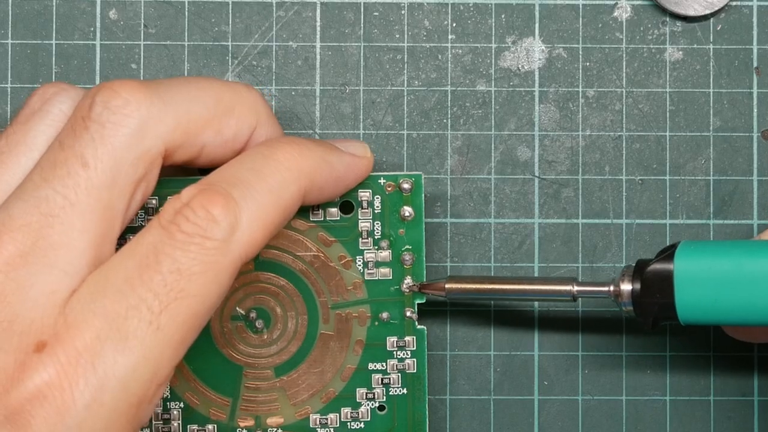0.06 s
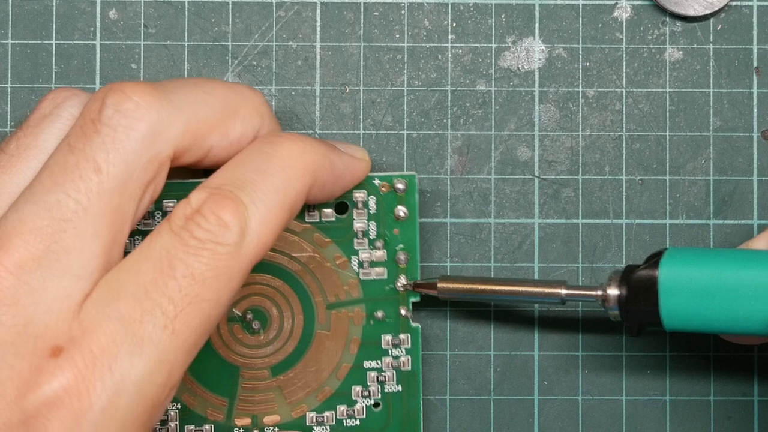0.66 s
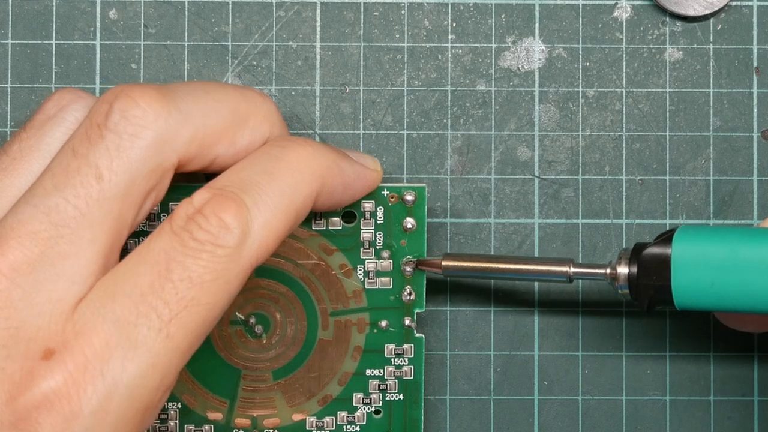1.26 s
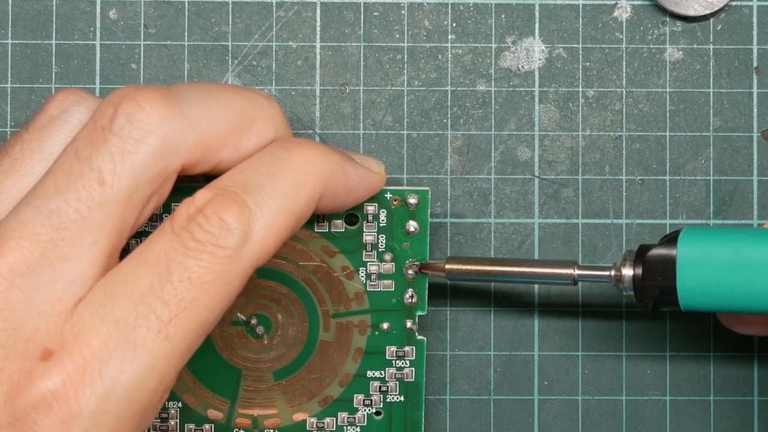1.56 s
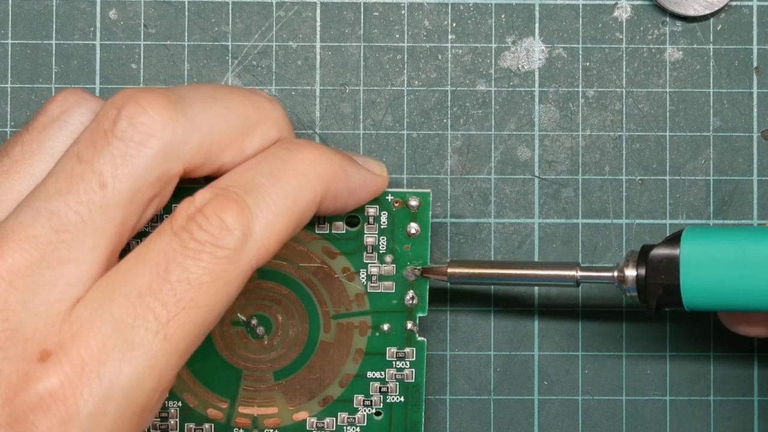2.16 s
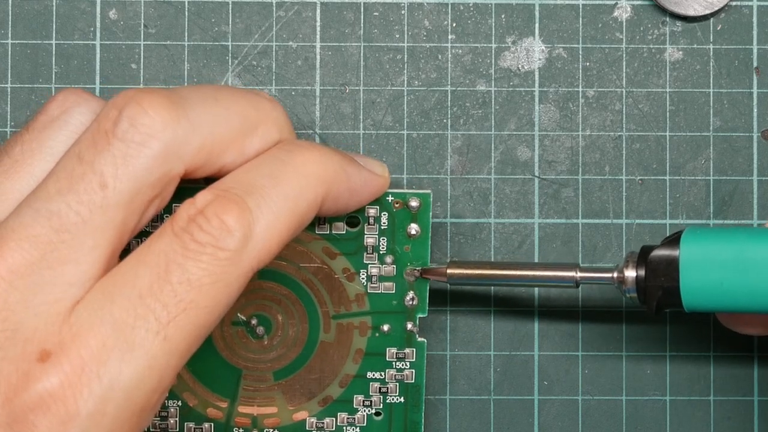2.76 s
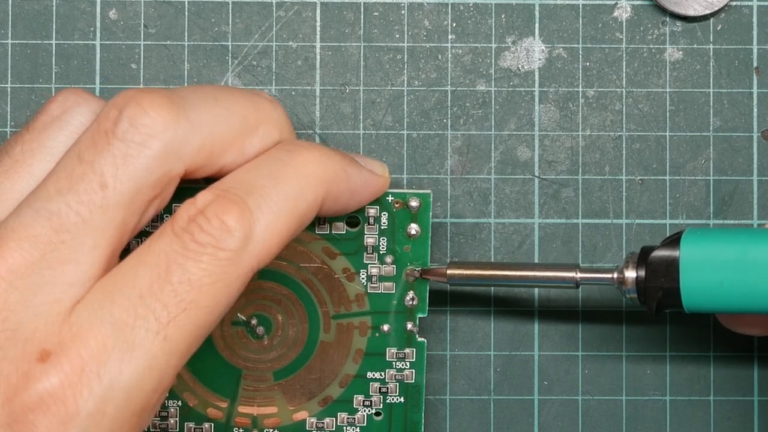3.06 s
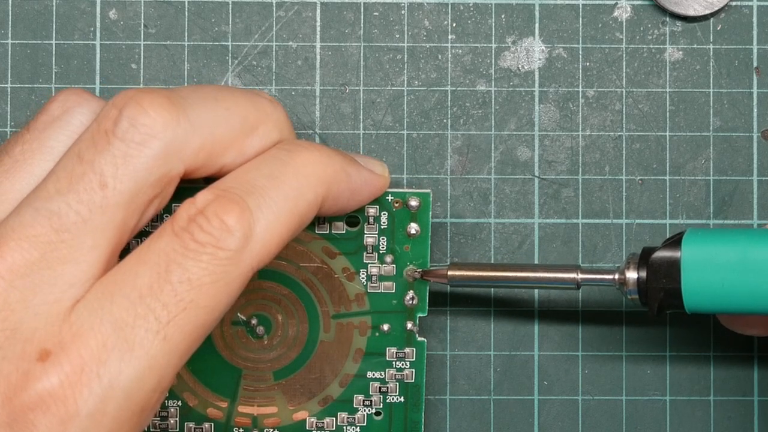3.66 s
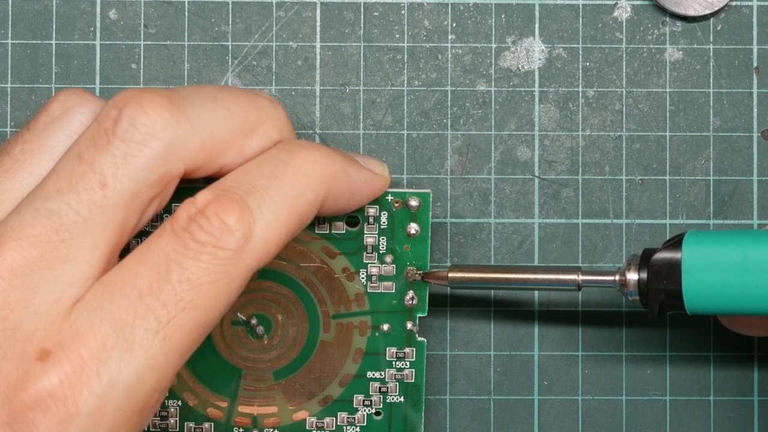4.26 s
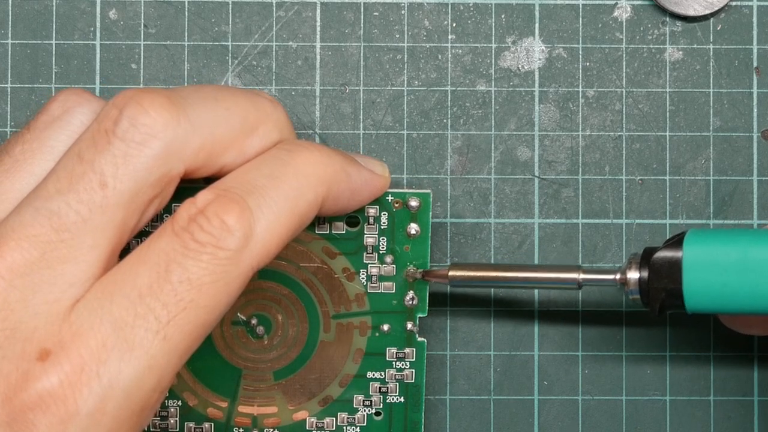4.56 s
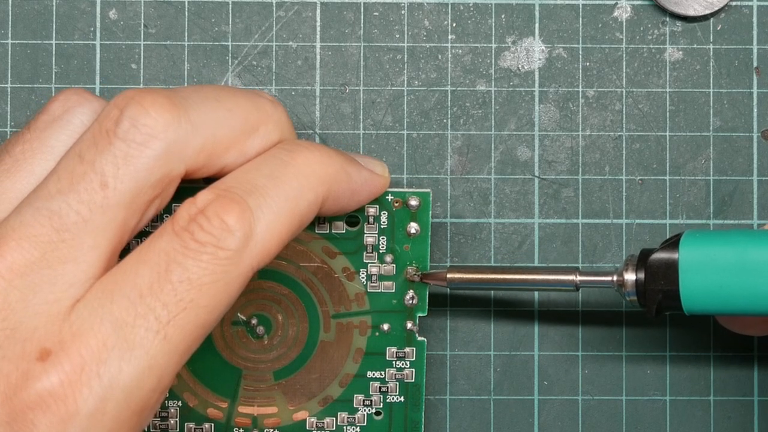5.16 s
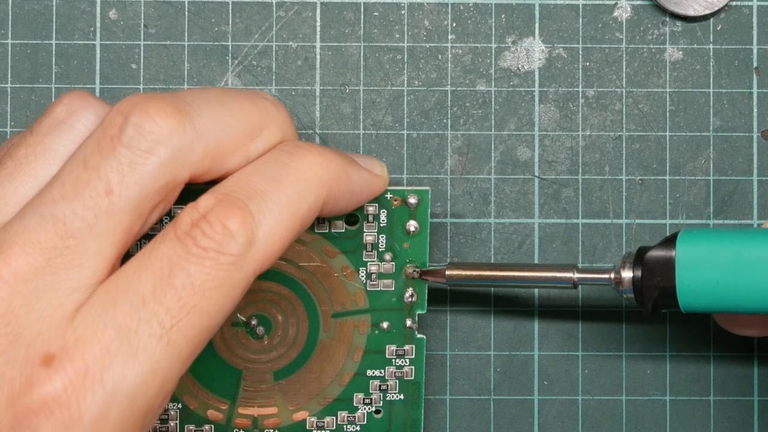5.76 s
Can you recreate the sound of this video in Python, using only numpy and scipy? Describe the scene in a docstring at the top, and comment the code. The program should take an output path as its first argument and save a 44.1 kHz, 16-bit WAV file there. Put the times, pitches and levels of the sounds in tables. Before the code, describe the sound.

A soldering iron tip faintly ticks, scratches and squeaks against a circuit board in a quiet room.

```python
"""Soldering at the bench

Close up in a quiet room, in stereo: an iron works a joint on a hand-held circuit board on a cutting mat.
The tip ticks against the pins, scratches, skids off once and squeaks as it sticks and slips.
The board thumps on the mat and rings briefly near 2 kHz, the iron's shaft longer, over rumble and hiss."""
import sys
import numpy as np
from scipy import signal
from scipy.fft import rfft, irfft, next_fast_len
from scipy.io import wavfile
from scipy.ndimage import map_coordinates

SR = 44100
rng = np.random.default_rng(int(sys.argv[2]) if len(sys.argv) > 2 else 0)


def unload_wav(signal):
    """Save mono or channel-first audio to the path in sys.argv[1] as 16-bit WAV at rate SR, clipped to [-1, 1]."""
    wavfile.write(
        sys.argv[1],
        SR,
        np.round(np.clip(np.atleast_2d(signal).T, -1, 1) * 32767).astype(np.int16),
    )


N = 255780
TOP_HZ = 15800

# The circuit board's modes. Each row: frequency in Hz, relative level in dB, t60 in seconds.
BOARD_MODES = [(536, -7, 0.033), (1350, 2.5, 0.011), (1690, 3.5, 0.0022), (1860, 22, 0.008),
               (2010, -23, 0.0021), (2515, -9, 0.051), (4020, -9.5, 0.039)]


def amp(db):
    """Decibels to gain."""
    return 10 ** (np.asarray(db) / 20)


def unit(x):
    """x at rms 1."""
    return x / np.sqrt(np.mean(x ** 2) + 1e-20)


def along(points, hz):
    """(Hz, value) points read on a log axis."""
    freqs, values = np.transpose(points)
    return np.interp(np.log(hz + 1), np.log(freqs + 1), values)


def wobble(rate, size):
    """A smooth random curve, rate knots a second."""
    knots = rng.standard_normal(int(size * rate / SR + 4))
    return map_coordinates(knots, [np.arange(size) * rate / SR])


def filtered(x, response):
    """x through a frequency response."""
    size = x.shape[-1]
    padded = next_fast_len(size + SR // 4)
    return irfft(rfft(x, padded) * response(np.fft.rfftfreq(padded, 1 / SR)), padded)[..., :size]


def coloured(x, spectrum):
    """x through a spectrum of (Hz, dB) points, at rms 1."""
    return unit(filtered(x, lambda hz: amp(along(spectrum, hz))))


def ring(modes, attack_s=0.00021):
    """The answer of damped modes to one blow, which takes a moment to spread."""
    t = np.arange(SR // 4) / SR
    swings = sum(amp(db - 60 * t / t60) * np.sin(2 * np.pi * hz * t) for hz, db, t60 in modes)
    return (1 - np.exp(-t / attack_s)) * swings


def through(x, answer):
    """x convolved with an answer scaled to energy 1."""
    return signal.fftconvolve(x, answer / np.linalg.norm(answer))[:N]


def add(track, start_s, sound):
    """Mix a sound into the track."""
    part = track[round(start_s * SR):][:len(sound)]
    part += sound[:len(part)]


def spread(sound, side, side_db):
    """A centred sound, with a side signal added left and subtracted right."""
    return sound + amp(side_db) * np.array([side, -side])


def background(rumble_db=-55.5, hiss_db=-60, mic_hiss_db=-69):
    """Room rumble and hiss in the centre, the microphones' own hiss at the sides."""
    # Three noise spectra. Each row: frequency in Hz, relative level in dB.
    rumble = [(12, -38), (20, -8.5), (54, -1), (86, -4.5), (139, -10), (177, -16), (226, -21.5),
              (304, -15.5), (367, -20.5), (409, -32.5), (500, -19.5), (650, -50), (1100, -120)]
    hiss = [(240, -34), (400, -0.5), (588, -5), (742, -4), (789, -4), (1510, -7), (1870, -8.5), (2020, -10),
            (14400, -12), (16000, -15.5)]
    mic_hiss = [(40, 2.5), (300, 5.1), (1500, 0.5), (15000, 1.7)]
    noise = lambda spectrum: coloured(rng.standard_normal(N), spectrum)
    centre = amp(rumble_db) * noise(rumble) + amp(hiss_db) * noise(hiss)
    return spread(centre, noise(mic_hiss), mic_hiss_db)


def room_tail():
    """The room's diffuse tail, whose top treble dies first."""
    # The room's decay. Each row: frequency in Hz, t60 in seconds.
    decay = [(200, 0.45), (1900, 0.18), (3500, 0.61), (6000, 0.29), (8000, 0.23), (15000, 0.053)]
    hz, t, noise = signal.stft(rng.standard_normal(SR // 2), SR, nperseg=256)
    return signal.istft(noise * amp(-60 * t / along(decay, hz)[:, None]), SR, nperseg=256)[1]


def bench_echoes(direct):
    """Reflections off the bench reach the microphones just behind the direct sound."""
    # Each row: delay in seconds, gain.
    reflections = [(.0031, .2), (.0048, .14), (0.0083, .1)]
    out = np.zeros(N)
    for delay, gain in reflections:
        add(out, delay, gain * direct)
    return out


def thumps(mat_hz=69, mat_t60=0.15, bump_s=3.7685, bump_db=-20.5, swell_cycles=1.6):
    """The board swings softly on the mat; once the iron lands on it and bumps it down harder."""
    # Soft presses on the board. Each row: start in seconds, level in dB.
    presses = [(.266, -39.5), (.33, -33.5), (.719, -42), (1.016, -44)]
    # The pressed-down board's modes. Each row: frequency in Hz, relative level in dB, t60 in seconds.
    pressed_modes = [(65.7, -9, 0.13), (100, -7.5, 0.12), (331, -6, 0.052), (467, 2, 0.031),
                     (640, -10.5, 0.045)]
    out = np.zeros(N)
    for start, db in presses:
        add(out, start, ring([(mat_hz, db, mat_t60)], attack_s=0.00085))
    for hz, db, t60 in pressed_modes:  # the low modes build up last
        add(out, bump_s, ring([(hz, bump_db + db, t60)], attack_s=swell_cycles / hz))
    return out


def tip_response(hz):
    """Treble resonances of tip and board that colour every slip."""
    # Each row: centre in Hz, width in Hz, relative level in dB.
    resonances = [(2930, 183, -3), (3854, 79, -5), (4330, 130, -5.5), (4710, 170, -2.5), (5200, 170, -2.5),
                  (5570, 190, -2.5), (6400, 55, 4), (6850, 97, 0), (7240, 255, 4), (8080, 210, -1.5),
                  (8600, 250, -3.5), (10410, 160, -1), (11170, 230, -11.5), (12440, 440, -6.5),
                  (14400, 250, -4)]
    return sum((-1) ** k * amp(db) * 1j * hz * width / (centre ** 2 - hz ** 2 + 1j * hz * width)
               for k, (centre, width, db) in enumerate(resonances))


def scratches(catches_per_s=2600, smooth_share=0.7, rise_share=0.38):
    """The tip drags over solder: tiny catches swell and die, shaking the board and hissing at the contact."""
    # Each row: crest time and length in seconds, then board, grit and dull knock levels in dB.
    drags = [(0.191, 0.01, -59, -53, -51), (0.317, 0.18, -68.5, -70, -61), (0.701, 0.0049, -61, -56, -46),
             (0.713, 0.014, -44.5, -48, -54.5), (2.872, .017, -67, -70, -58), (3.003, 0.025, -68, -64, -49),
             (3.069, 0.0062, -58, -66, -50.5), (3.171, 0.032, -58, -64, -58.5),
             (3.357, 0.021, -54, -60.5, -61), (3.529, .005, -44, -36, -72),
             (3.5392, 0.011, -33, -23.5, -76), (3.553, 0.015, -54, -41, -70),
             (3.7653, 0.007, -36, -51, -68), (3.771, 0.016, -39.5, -42.5, -45.5),
             (3.844, 0.017, -56.5, -59, -49), (4.237, 0.031, -51.5, -66, -62),
             (4.262, 0.013, -47.5, -65, -74), (4.325, 0.01, -53.5, -57, -78),
             (4.532, 0.022, -47.5, -58, -52.5), (4.618, 0.0061, -38.5, -45.5, -44),
             (4.672, 0.006, -50, -58.5, -54), (4.834, 0.029, -53, -50, -61), (5.34, 0.032, -59, -67, -82),
             (5.378, 0.0063, -52, -52, -47.5)]
    # The dull knock's spectrum. Each row: frequency in Hz, relative level in dB.
    knock_spectrum = [(60, -19), (150, 5), (300, -15.5), (470, 1), (650, -8), (950, -10.5), (1200, -8.5),
                      (2000, -32), (5000, -82)]
    t = np.arange(N) / SR
    catches = unit(rng.standard_normal(N) * (rng.random(N) < catches_per_s / SR))
    friction = unit(catches + smooth_share * rng.standard_normal(N))
    envelopes = np.zeros((3, N))
    for crest, length, *levels in drags:
        near = abs(t - crest) < 0.25
        lag = (t[near] - crest) / length
        width = np.where(lag < 0, rise_share, 1 - rise_share)
        swell = np.exp(-abs(lag / width) ** 0.98)  # a pointed crest
        envelopes[:, near] += amp(levels)[:, None] * swell
    board = through(envelopes[0] * friction, ring(BOARD_MODES))
    grit = envelopes[1] * unit(filtered(friction, tip_response))
    knock = envelopes[2] * coloured(friction, knock_spectrum)
    return board + grit + knock


def squeaks(grip_s=0.0016, release_s=0.0023, sag_hz_per_s=19100, jitter=0.069, flutter_db=2):
    """The tip sticks and slips unsteadily, slowing as it bites, then lets go; the shaft rings on."""
    # Each row: start and length in seconds, first slip rate in Hz, fundamental and overtone levels
    # in dB, rasp from 0 to 1, drive to the shaft's low mode in dB.
    grips = [(3.689, 0.0014, 2487, -63, -39, 0.3, -75), (4.071, 0.02, 2990, -52, -59, 0.2, -64),
             (4.088, 0.0068, 2755, -36, -50, .2, -46.5), (4.444, 0.0054, 2980, -37, -44, .3, -58),
             (4.4530, .015, 2460, -38, -41.5, 0.55, -54), (4.473, 0.0061, 2804, -33.5, -41, .4, -36),
             (4.488, .012, 2255, -32.5, -51.5, 0.87, -41), (4.536, 0.0085, 2040, -35.5, -54, 0.66, -62),
             (4.546, 0.0032, 2500, -47, -50, 0.8, -44), (4.789, 0.0033, 2860, -46, -55, .3, -47),
             (4.8337, 0.0039, 2670, -45, -40, 0.4, -60), (4.839, 0.011, 2560, -36.5, -38, 0.88, -39),
             (3.531, 0.0058, 2824, -42, -26, 0.83, -60), (3.5353, 0.003, 1975, -21, -30, 0.42, -48),
             (3.541, 0.0068, 1735, -32.5, -30.5, 0.85, -60)]
    # The shaft's modes. Each row: frequency in Hz, level in dB relative to its drive, t60 in seconds.
    shaft_modes = [(2600, 0, .1), (10280, -18, .07)]
    out, size = np.zeros(N), SR // 25
    t = np.arange(size) / SR
    for start, length, start_hz, tone_db, overtone_db, rasp, shaft_db in grips:
        slip_hz = start_hz - sag_hz_per_s * np.minimum(t, length)
        unsteady_hz = slip_hz * (1 + jitter * rasp * wobble(1080, size))
        phase = 2 * np.pi * np.cumsum(unsteady_hz) / SR
        slips = unit(sum((k * slip_hz < TOP_HZ) * np.cos(k * phase) for k in range(2, 8)))
        overtones = unit(filtered(slips + rasp * rng.standard_normal(size), tip_response))
        envelope = np.minimum(t / grip_s, 1) * np.exp(-np.maximum(t - length, 0) / release_s)
        envelope *= amp(flutter_db * wobble(700, size))
        add(out, start, envelope * (amp(tone_db) * np.sin(phase) + amp(overtone_db) * overtones))
        # the shaft's low mode takes the jolt of the release; the overtones drive its high one
        drives_db = (shaft_db, overtone_db)
        modes = [(hz, db + drive, t60) for (hz, db, t60), drive in zip(shaft_modes, drives_db)]
        add(out, start + length / 2, ring(modes, attack_s=length / 2))
    return out


def ticks(snap_t60=0.0064, flex_below_hz=1500):
    """The tip snaps against a pin and rings the board; the contact point sets how much the board flexes."""
    # Each row: start in seconds, board peak in dB, snap peak in dB, extra flex of the low modes in dB.
    strikes = [(0.096, -66, -44, -6), (.1861, -59, -42, 0), (.6114, -60, -44, 0), (1.0040, -24, -27, -10),
               (1.1012, -20, -33.5, 1.5), (1.18, -42.5, -63, -4), (2.1764, -58, -43, 0),
               (2.3326, -62, -39, 0), (2.9987, -44.5, -53, 4), (3.0184, -40, -58, -2),
               (3.0658, -45, -53, -2), (3.555, -32, -40, -5), (3.6167, -38.5, -40, -2),
               (3.6908, -44, -50, 2), (3.7773, -22.5, -48, -20), (4.0555, -40, -32, -5),
               (4.2342, -41.5, -55, 0), (4.3023, -52, -39, 0), (4.437, -39.5, -52, -6),
               (4.4925, -34, -26.5, 5), (4.6156, -30.5, -24.5, -3), (4.672, -43, -58, 7),
               (4.7622, -41.5, -40.5, 2), (5.375, -55, -44, 0), (5.395, -48, -43, 0), (5.5959, -30, -41, 6)]
    # The bright snap's spectrum. Each row: frequency in Hz, relative level in dB.
    snap_spectrum = [(1000, -62), (3000, -6.5), (4500, -0.5), (6200, 6.5), (7600, 7), (9500, -2.5),
                     (12000, -30), (15500, 4)]
    out, t = np.zeros(N), np.arange(SR // 4) / SR
    for start, board_db, snap_db, flex_db in strikes:
        board = ring([(hz, db + flex_db * (hz < flex_below_hz) + 0.5 * rng.normal(), t60)
                      for hz, db, t60 in BOARD_MODES])
        snap = coloured(rng.standard_normal(len(t)), snap_spectrum) * amp(-60 * t / snap_t60)
        add(out, start, amp(board_db) * board / abs(board).max() + amp(snap_db) * snap / abs(snap).max())
    return out


def scene(room_db=-21):
    """The work sits close and central, widened by the bench echoes, with the room faint behind it."""
    direct = ticks() + scratches() + squeaks()
    echoes = bench_echoes(direct)
    near = direct + echoes + thumps()
    room = spread(through(near, room_tail()), through(near, room_tail()), side_db=-18)
    return spread(near, echoes, side_db=-16) + amp(room_db) * room + background()


def record(dry):
    """Nothing above the band limit gets through."""
    return filtered(dry, lambda hz: hz < TOP_HZ)


dry = scene()
out = record(dry)
unload_wav(out)
```